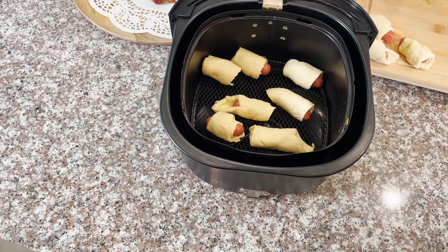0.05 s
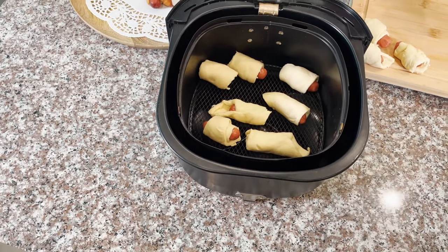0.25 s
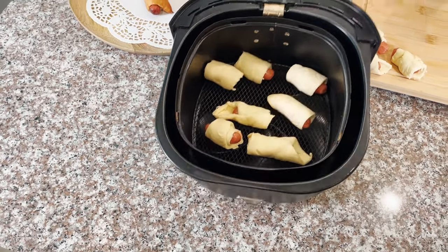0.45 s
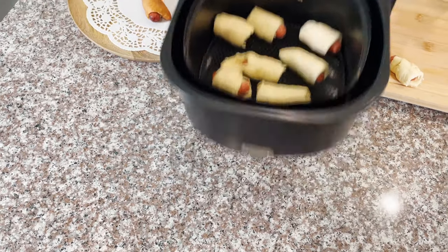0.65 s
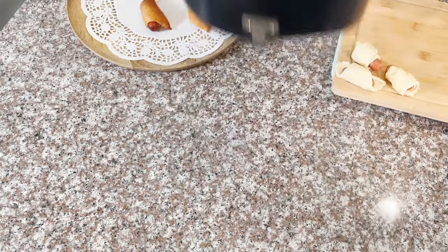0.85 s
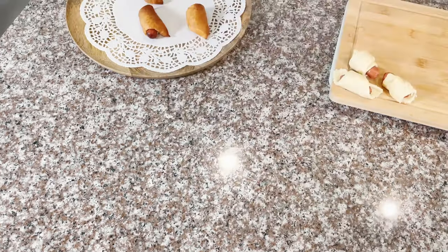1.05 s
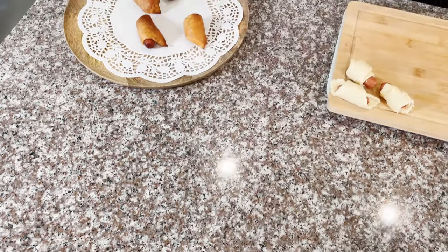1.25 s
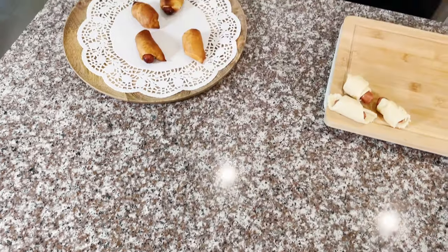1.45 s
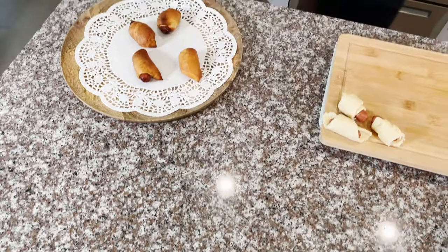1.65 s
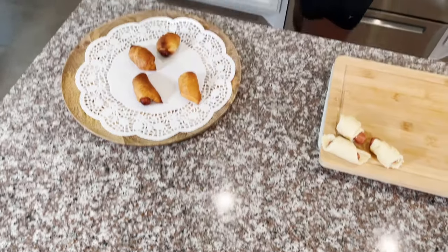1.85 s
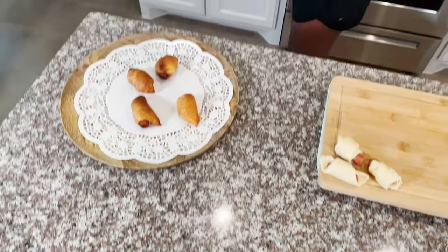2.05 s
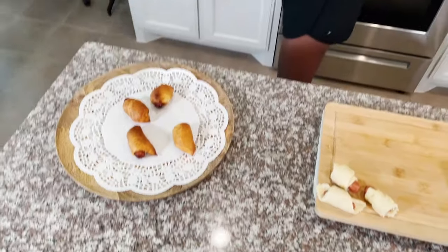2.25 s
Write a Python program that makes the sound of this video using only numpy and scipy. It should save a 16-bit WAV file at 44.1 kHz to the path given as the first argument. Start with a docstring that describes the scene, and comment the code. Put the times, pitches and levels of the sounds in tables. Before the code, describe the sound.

Plastic knocks and one ringing metal clack as an air fryer basket is lifted.

```python
"""A quiet kitchen, the microphone close to an air fryer basket on a stone counter.
A soft swish, probably of clothing, opens over the room's rumble. From 0.2 s the basket is lifted:
its plastic pan knocks, thuds and scrapes on the stone. At 0.54 s, once it is free, the metal insert
drops home with a ringing clack. From 1.3 s the basket is carried off with faint rattles,
and more swishes pass, the last at about 2 s."""
import sys
import numpy as np
from scipy import signal
from scipy.fft import rfft, irfft
from scipy.io import wavfile

SR = 44100
rng = np.random.default_rng(int(sys.argv[2]) if len(sys.argv) > 2 else 0)


def int16_out(signal):
    """Quantize to a 16-bit WAV file."""
    q = np.round(np.clip(np.atleast_2d(signal).T, -1, 1) * 32767)
    wavfile.write(sys.argv[1], SR, q.astype(np.int16))


N = 101429
T, HZ = np.arange(N) / SR, np.fft.rfftfreq(N, 1 / SR)

# how alike the room sounds left and right (frequency [Hz], correlation [0-1])
ROOM_LIKENESS = [(50, 0.88), (250, 0.74), (600, 0.2), (2000, 0.25), (5000, 0.17), (9000, 0.91),
                 (15000, 0.77)]


def pan():
    """Each knock on the stone rings the damped plastic with a short crunch; the weight thuds beneath."""
    # dull knocks (time [s], level [dB], tilt [dB/octave], pitch of the spot struck [Hz])
    knocks = [(.2055, -8, 3.5, 1480), (0.2183, -1.5, -1.5, 1046), (0.228, -9.5, 5, 1390),
              (.243, -13.5, -8, 510), (.309, -9, 0, 1000), (0.3182, -1.5, 1, 910), (.320, -1.5, 0.5, 754),
              (.329, -6.5, -4.5, 520), (.3645, -1, -3, 1075), (.397, -5, 5, 1010), (.400, -5.5, 1, 1044),
              (.440, 0.5, 0.5, 1346), (.453, -3.5, 2.5, 1060), (.486, -12.5, -7, 535),
              (.612, -14.5, -7, 734), (1.618, -36.5, -12, 523)]
    # modes of the plastic (frequency [Hz], level [dB], t60 [s])
    pan_modes = [(510.5, -35, 0.13), (535, -44.5, 0.15), (597, -40, 0.17), (857, -42.5, 0.12),
                 (1026, -35.5, 0.051), (1056.6, -40, .085), (1300, -42.5, 0.043), (1372, -41, 0.045),
                 (1470, -46.5, 0.11), (1800, -56, 0.041)]
    # contact noise (frequency [Hz], relative level [dB])
    crunch_spectrum = [(100, -24.5), (400, -15.5), (750, 2), (1400, -5.5), (2100, -11.5), (4000, -28),
                       (8000, -36.5), (16000, -46)]
    # the weight meeting the counter (time [s], level [dB], tilt [dB/octave])
    thuds = [(.208, -1, 7), (0.222, -1.5, -1), (.243, -4, 3), (0.319, -4, 1), (0.346, -6.5, -8.5),
             (0.393, -5.5, -0.5), (0.471, -5, -12), (0.49, -5, -10.5), (0.543, -12, 1)]
    # low modes of a thud (frequency [Hz], level [dB], t60 [s])
    thud_modes = [(90.3, -39, .17), (105.6, -52.5, 0.12), (211, -40, 0.091), (272.8, -41, 0.098),
                  (328, -47.5, 0.039)]
    spot_db, spot_t60_s, crunch_db = -31.5, 0.033, -38
    out = np.zeros((2, N))
    crunch = noise(crunch_spectrum, alike=0.42)
    for s, db, slope, spot_hz in knocks:
        modes = pan_modes + [(spot_hz, spot_db, spot_t60_s)]
        grit = colour(np.roll(crunch, rng.integers(N), 1), tilt(slope, pivot_hz=870))
        add(out, s, amp(db) * ring(modes, rise_s=0.0011, slope_db=slope, pivot_hz=865))
        add(out, s, amp(db + crunch_db) * grit * decay(t60=0.035))
    for s, db, slope in thuds:
        add(out, s, amp(db) * ring(thud_modes, rise_s=0.0031, slope_db=slope, pivot_hz=130))
    return out


def insert():
    """Metal meets metal: returns the bright, shimmering clicks and the long ring of the modes."""
    # hard clacks (time [s], click level [dB], click tilt [dB/octave], ring level [dB])
    clacks = [(.3085, -14, -1, -28), (.318, .5, -0.5, -22), (.449, -5, 3, -18), (.5418, 0.5, 1.5, 1),
              (0.546, -2.5, -2, -23), (1.326, -34, -2.5, -35), (1.407, -36.5, -8, -39.5)]
    # modes of the insert (frequency [Hz], level [dB], t60 [s], left minus right [dB])
    metal_modes = [(489.3, -31, 0.47, 5), (1060, -53, 0.409, 2.5), (1873, -40, 0.22, 0.5),
                   (1896, -36, 0.13, -6.5), (1940, -51.5, .52, 16), (2036, -46, 0.15, 8.5),
                   (2050, -44.5, 0.08, -6), (2320, -47, 0.17, 0), (2403, -54.5, .55, 2),
                   (2450, -37.5, 0.2, -3), (2920, -51.5, 0.18, 1.5), (3400, -49.5, 0.27, -0.5),
                   (4340, -51, 0.18, 4), (4730, -52.5, 0.24, 2), (5380, -50.5, .13, 1.5)]
    # contact noise (frequency [Hz], relative level [dB])
    click_spectrum = [(200, -20), (700, -2), (2200, 6), (3500, -1), (5500, -7.5), (8500, -10),
                      (11000, -16.5), (14500, -15.5), (16000, -8.5)]
    click_db, shimmer_db = -34.5, -21.5
    clicks, rings = np.zeros((2, 2, N))
    click = noise(click_spectrum, alike=0.88)
    wires = mesh()
    sides = [[(hz, db + side * lr, t60) for hz, db, t60, lr in metal_modes] for side in (0.5, -0.5)]
    ringing = np.array([ring(modes, rise_s=0.0026) for modes in sides])
    fade = decay(t60=0.045) + amp(shimmer_db) * decay(t60=0.44)
    for s, db, slope, ring_db in clacks:
        burst = colour(np.roll(click, rng.integers(N), 1), tilt(slope, pivot_hz=2790))
        add(clicks, s, amp(click_db + db) * fade * burst)
        add(clicks, s, amp(db) * wires)
        add(rings, s, amp(ring_db) * ringing)
    return clicks, rings


def mesh():
    """The insert's wire mesh rings in many faint modes, weaker toward the top."""
    low_hz, high_hz = 2603, 7985
    t = T[:SR // 2]
    partials = 0
    for hz in np.geomspace(low_hz, high_hz, num=24):
        gains = rng.standard_normal((2, 1)) / hz
        detuned_hz = hz * rng.uniform(0.98, 1.02)
        partials += gains * np.sin(2 * np.pi * (detuned_hz * t + rng.random()))
    return amp(-56.5) * unit(partials) * decay(t60=0.28, t=t)


def scrapes():
    """The pan slides: dense tiny slips pass through its resonances."""
    # slides (start [s], length [s], level [dB], tilt [dB/octave])
    slides = [(0.307, 0.202, -2.5, 0), (1.392, 0.2, -23.5, 0), (1.513, 0.032, -23, -2)]
    # resonances of the rubbed pan (frequency [Hz], relative level [dB])
    rub_spectrum = [(150, -37), (400, -14.5), (520, 14.5), (760, -9.5), (1060, 3.5), (1300, -14.5),
                    (1900, -3.5), (2700, -8), (4500, -21), (8500, -24), (14000, -30), (16000, -36.5)]
    scrape_db, edge_s, slips_per_s, spread_db = -47.5, 0.025, 2500, 1.5
    slips = rng.choice([-1, 1], N) * amp(spread_db * np.minimum(rng.exponential(1, N), 4))
    slips *= rng.random(N) < slips_per_s / SR
    rub = unit(colour(slips, amp(read(rub_spectrum))))
    out = np.zeros(N)
    for s, length, db, slope in slides:
        envelope = np.clip(np.minimum(T - s, s + length - T) / edge_s + 0.5, 0, 1)
        out += amp(scrape_db + db) * envelope * colour(rub, tilt(slope, pivot_hz=898))
    return out


def swishes():
    """Smooth friction hiss near the microphone, probably clothing, swells, holds and fades."""
    # swishes (start [s], attack [s], hold [s], release [s], level [dB], tilt [dB/octave], peak [Hz])
    strokes = [(-.06, 0.039, 0.024, 0.12, -1, 0.5, 4170), (0.04, 0.093, 0.3, .1, -14, 1, 14200),
               (1.089, 0.051, 0.018, 0.13, -11.5, -2.5, 14400), (1.436, 0.076, .03, 0.14, -23, 1, 14300),
               (1.931, 0.089, 0.18, 0.2, -1, 0.5, 2580)]
    # friction hiss (frequency [Hz], relative level [dB])
    hiss_spectrum = [(300, -20), (1100, -15), (1700, -1.5), (2600, -7), (3500, -5), (6000, -8.5),
                     (8500, -7), (11000, -9.5), (14500, -8.5), (16000, -9.5)]
    swish_db, peak_db, peak_octaves = -63.5, 7, 0.39
    out = np.zeros((2, N))
    for s, attack, hold, release, db, slope, peak_hz in strokes:
        peak = amp(peak_db * np.exp(-(np.log2((HZ + 1) / peak_hz) / peak_octaves) ** 2))
        hiss = colour(noise(hiss_spectrum, alike=0.63), peak * tilt(slope, pivot_hz=4030))
        end = s + attack + hold + release
        envelope = np.clip(np.minimum((T - s) / attack, (end - T) / release), 0, 1)
        out += amp(swish_db + db) * envelope * hiss
    return out


def kitchen(x):
    """A few echoes off the counter, then a diffuse tail that lasts longest around 2 kHz."""
    # reverberation time (frequency [Hz], t60 [s])
    room_t60 = [(100, .25), (500, 0.51), (2000, 0.67), (5000, 0.53), (14000, .27)]
    tail_db, early_db, early_s = -11, -12, 0.015
    hz, t, spectra = signal.stft(rng.standard_normal((2, SR)), SR, nperseg=256)
    spectra = pair(spectra, read(ROOM_LIKENESS, hz)[:, None])
    spectra *= np.exp(-np.log(1000) * t / read(room_t60, hz)[:, None])
    tail = signal.istft(spectra, SR, nperseg=256)[1][:, :SR]
    tail *= np.minimum(T[:SR] / early_s, 1) ** 2
    response = amp(tail_db) * tail / np.linalg.norm(tail[0])
    for channel in response:
        echoes = (rng.uniform(0.0958, 1, size=8) * early_s * SR).astype(int)
        channel[echoes] += amp(early_db) * rng.choice([-1, 1], len(echoes)) / np.sqrt(len(echoes))
    return signal.fftconvolve(x, response, axes=1)[:, :N]


def room_tone():
    """The kitchen at rest: low rumble and a wavering appliance hum."""
    # room rumble (frequency [Hz], relative level [dB])
    rumble_spectrum = [(15, -42), (28, -25), (50, -6.5), (75, -5.5), (130, -4.5), (200, -15.5),
                       (280, -14.5), (430, -18), (700, -25.5), (900, -34), (1700, -41), (4000, -48),
                       (9000, -47.5), (12000, -54), (15000, -49)]
    # appliance hum (frequency [Hz], level [dB])
    tones = [(57, -70), (133, -74), (246, -75.5)]
    wavers = 0.67 * unit(colour(rng.standard_normal((len(tones), N)), np.exp(-HZ / 4)))  # radians
    hum = sum(amp(db) * unit(np.sin(2 * np.pi * hz * T + w)) for (hz, db), w in zip(tones, wavers))
    return amp(-62.5) * noise(rumble_spectrum, read(ROOM_LIKENESS)) + hum


def ring(modes, rise_s, slope_db=0, pivot_hz=1):
    """Damped modes struck by one contact, tilted by its hardness."""
    t = T[:SR]
    out = 0
    for hz, db, t60 in modes:
        out += amp(db + slope_db * np.log2(hz / pivot_hz)) * decay(t60, t) * np.sin(2 * np.pi * hz * t)
    return (1 - np.exp(-t / rise_s)) * out


def decay(t60, t=T):
    """Exponential fade by 60 dB in t60 seconds."""
    return np.exp(-np.log(1000) * t / t60)


def noise(spectrum, alike):
    """Two partly alike channels of coloured noise, rms 1."""
    white = pair(rfft(rng.standard_normal((2, N))), alike)
    return unit(irfft(white * amp(read(spectrum)), N))


def pair(z, alike):
    """Makes the second of two spectra partly like the first."""
    return np.array([z[0], alike * z[0] + np.sqrt(1 - alike ** 2) * z[1]])


def colour(x, gain):
    """Filters by a gain for each frequency."""
    return irfft(rfft(x) * gain, N)


def tilt(slope_db, pivot_hz):
    """Gain sloping by slope_db an octave, for two octaves each side of a pivot."""
    return amp(slope_db * np.clip(np.log2((HZ + 1) / pivot_hz), -2, 2))


def read(points, hz=HZ):
    """Joins table rows on a log-frequency axis."""
    f, value = np.transpose(points)
    return np.interp(np.log(hz + 1), np.log(f + 1), value)


def add(mix, s, sound):
    """Mixes a sound in at time s."""
    part = mix[..., round(s * SR):][..., :sound.shape[-1]]
    part += sound[..., :part.shape[-1]]


def amp(db):
    """Decibels to gain."""
    return 10 ** (np.asarray(db) / 20)


def unit(x):
    """Scales to rms 1."""
    return x / np.sqrt(np.mean(x ** 2) + 1e-20)


def scene():
    """The basket close up, the kitchen answering behind it, with swishes and room tone."""
    clicks, rings = insert()
    handling = pan() + clicks + scrapes()
    reverb = kitchen(handling + amp(-9) * rings)
    return handling + rings + reverb + swishes() + room_tone()


def record(dry):
    """The recorder shifts the phase between the channels and the two ports differ in level; the recorder cuts
    the top treble."""
    # phase between the channels (frequency [Hz], left lead [rad])
    channel_phase = [(20, 0), (1000, 0), (2000, .3), (3500, 1), (5200, .5), (6000, -1.3), (7500, -2.7),
                     (8600, -3.2), (10000, -3.9), (12000, -5.2), (13300, -6.1), (15500, -6.5)]
    # balance of the ports (frequency [Hz], left minus right [dB])
    port_balance = [(60, .5), (130, 1.5), (280, 2.5), (550, 0), (1100, 2.9), (2000, 1.2), (4000, 4.5),
                    (8500, 0.5), (14000, -0.5)]
    side = np.array([[0.5], [-0.5]])
    picked_up = colour(dry, np.exp(1j * side * read(channel_phase)) * amp(side * read(port_balance)))
    lowpass = signal.firwin(511, cutoff=15950, window=("kaiser", 9), fs=SR)
    return signal.oaconvolve(picked_up, lowpass[None], "same")


dry = scene()
out = record(dry)
int16_out(out)
```